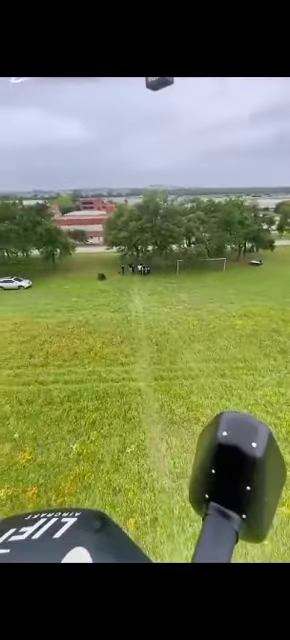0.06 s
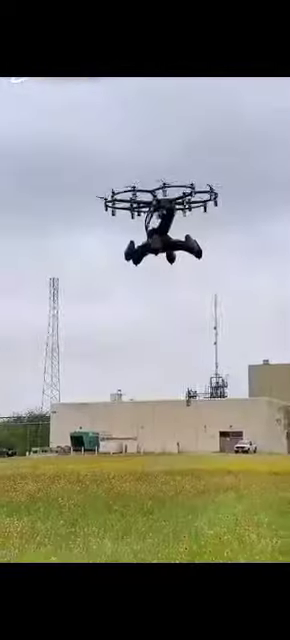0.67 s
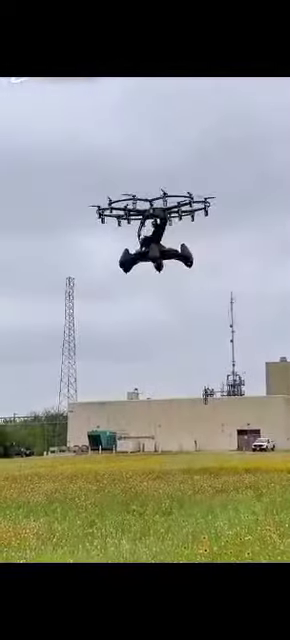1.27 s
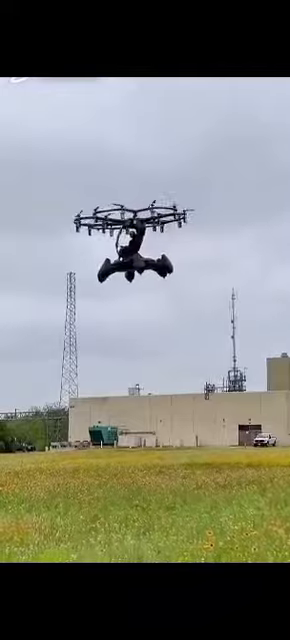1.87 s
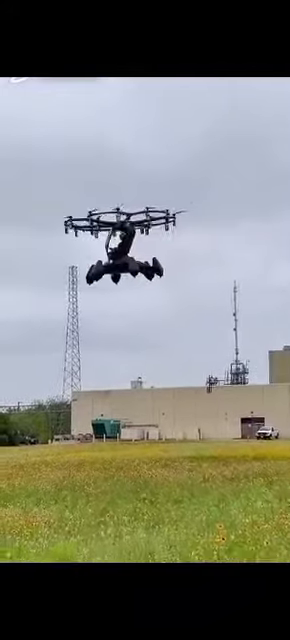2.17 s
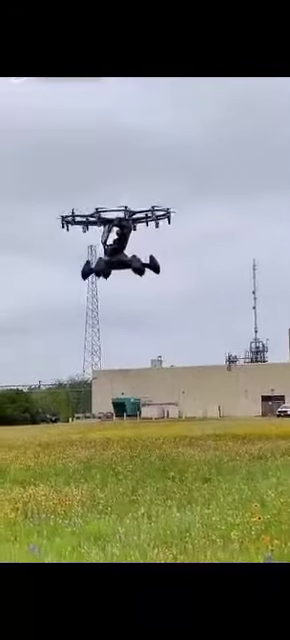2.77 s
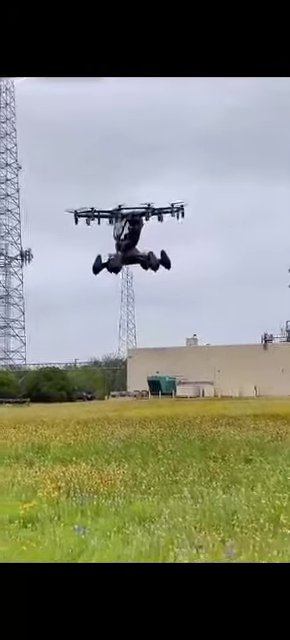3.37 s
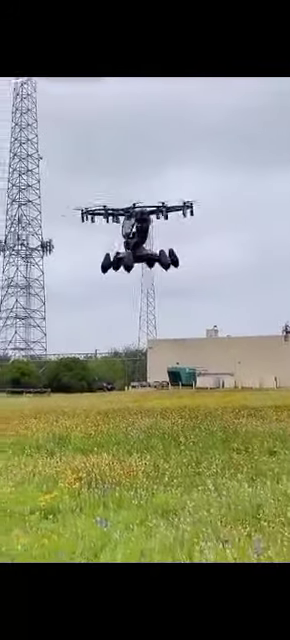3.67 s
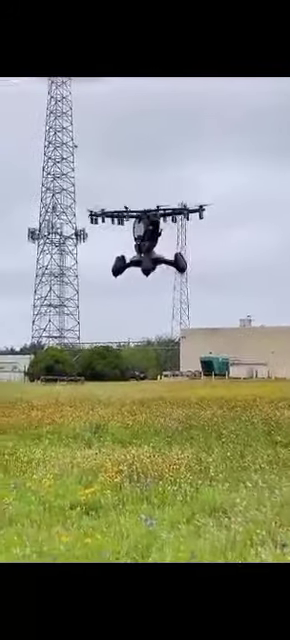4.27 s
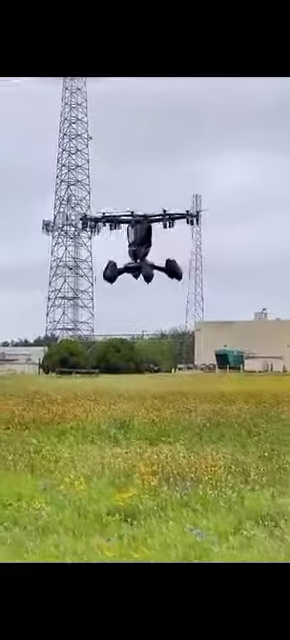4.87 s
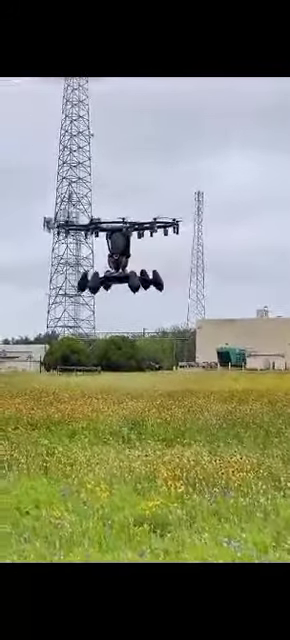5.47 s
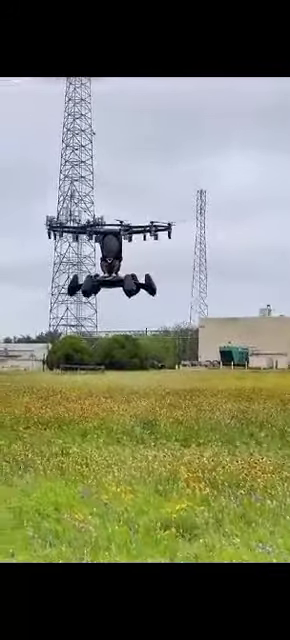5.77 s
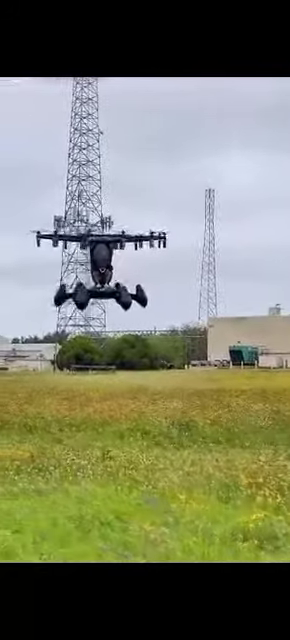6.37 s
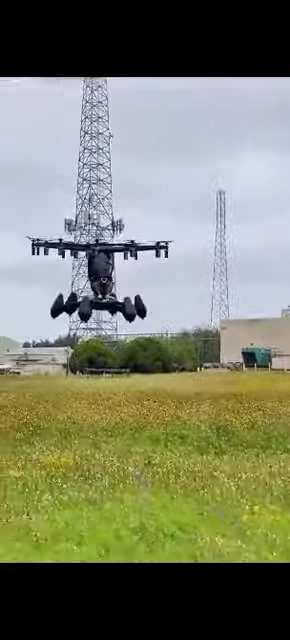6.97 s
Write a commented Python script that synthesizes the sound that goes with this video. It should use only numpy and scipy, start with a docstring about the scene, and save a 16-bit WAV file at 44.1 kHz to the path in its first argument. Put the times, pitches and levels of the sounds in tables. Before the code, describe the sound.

Many propellers buzz and throb as a big multicopter flies nearby, with airy hiss, brief high whistles and a slowly sweeping tone.

```python
"""A throbbing hum and a rough buzz: a large multicopter hovers and turns over a meadow.
Its eighteen two-blade propellers run at slightly different speeds, so their hum swells and fades
and their blade pulses merge into the buzz. The blades hiss and whistle, and air churns below them.
The echo from the ground cancels some pitches and boosts others, in a sweep as the craft moves."""
import sys
import numpy as np
from scipy import signal
from scipy.fft import rfft, irfft, next_fast_len
from scipy.io import wavfile
from scipy.ndimage import uniform_filter1d

SR = 44100
rng = np.random.default_rng(int(sys.argv[2]) if len(sys.argv) > 2 else 0)


def dump(signal):
    """Clip the signal to [-1, 1] and save it as 16-bit WAV at the path in sys.argv[1]."""
    limited = np.clip(np.atleast_2d(signal).T, -1, 1)
    pcm = np.round(limited * 32767).astype(np.int16)
    wavfile.write(sys.argv[1], SR, pcm)


N = 309141
T = np.arange(N) / SR
HZ = np.fft.rfftfreq(1024, 1 / SR)[:, None]

# How often blades pass, on hard-working and lightly loaded propellers:
# time_s, fast_hz, slow_hz, scatter_share
BLADE_RATES = [(.2, 98.5, 74.3, .007), (.6, 96, 77, .01), (.9, 94.2, 79, .014), (1.25, 92.2, 80, .018),
               (2, 91, 80.6, .024), (2.6, 91.8, 80.3, .026), (3.4, 90.5, 80.5, .028), (4.2, 87.3, 84, .026),
               (5, 87.8, 85.75, .034), (5.6, 87.84, 83.7, 0.04), (6.1, 92.5, 80.15, .05),
               (6.7, 94, 80.1, 0.041)]
# Loudness, falling as the craft turns away and rising as it nears: time_s, buzz_db, rasp_db
BLADE_LEVELS = [(0.2, -28, -33), (0.45, -25, -28), (.7, -24.5, -26), (1.0, -22.5, -26),
                (1.45, -23.5, -27.5), (1.7, -23, -29), (1.9, -22.5, -28), (2.5, -22.5, -27.5),
                (2.8, -24, -28.5), (3.3, -24.5, -28), (4.1, -23.5, -28.5), (4.7, -22.5, -27.5),
                (4.9, -22, -27), (5.15, -21.5, -29.5), (5.4, -21.5, -26), (5.75, -21.5, -26.5),
                (6.05, -22, -26), (6.7, -21, -24.5)]
# How the craft faces us: time_s, view (0 below, 1 side, 2 oblique, 3 quarter, 4 front)
VIEW = [(.2, 4), (.65, -0.5), (1.3, 1), (2.5, 1.4), (3.05, 2), (3.7, 2), (4.4, 3), (5.2, 3.5), (5.35, 3.5)]


def gain_of(db):
    """Turns decibels into a multiplier."""
    return 10 ** (np.asarray(db) / 20)


def evened(x):
    """Scales x to an average strength (rms) of 1."""
    return x / np.sqrt(np.mean(x ** 2) + 1e-20)


def steadied(x, size):
    """Keeps the strength of x near 1 over every stretch of size samples."""
    power = uniform_filter1d(uniform_filter1d(x ** 2, size=size), size=size)
    return x / np.sqrt(power + 0.0093 * power.mean())


def curve(rows, t=T):
    """Reads a table's columns at times t, sliding between its rows."""
    times, *columns = np.transpose(rows)
    return [np.interp(t, times, column) for column in columns]


def at_pitch(rows, hz):
    """Reads a table at pitches hz, sliding between its rows in octaves."""
    pitches, values = np.transpose(rows)
    return np.interp(np.log(hz + 1), np.log(pitches + 1), values)


def coloured(x, colour):
    """Filters x by a table of pitch_hz, level_db; the result has strength 1."""
    size = next_fast_len(N)
    gains = gain_of(at_pitch(colour, np.fft.rfftfreq(size, 1 / SR)))
    return evened(irfft(rfft(x, size) * gains, size)[:N])


def turning(x, colours, view):
    """Fades x from one tone colour to the next as view counts through them."""
    return evened(sum(np.maximum(1 - abs(view - k), 0) * coloured(x, colour)
                      for k, colour in enumerate(colours)))


def wander(rate):
    """A smooth random drift of strength 1 that swings up to rate times a second."""
    t = T[::200]
    hz = rate * np.geomspace(.1, 1, 20)[:, None]
    waves = np.sin(2 * np.pi * (hz * t + rng.random(hz.shape))) / np.sqrt(hz)
    return np.interp(T, t, evened(waves.sum(0)))


def propellers(count=18, trim=.6, light_db=1.0, fade_db=2, uneven_push=0.41, uneven_slap=0.44):
    """Each passing blade adds to a hum, gives the air a push and a slap, and swishes as it nears."""
    fast_hz, slow_hz, scatter = curve(BLADE_RATES)
    hum, pushes, slaps, swish = np.zeros((4, N))
    for k, offset in enumerate(np.linspace(-1.6, 1.6, count)):
        light = k % 3 == 1
        # the flight controller keeps trimming each motor around its own speed
        hz = (slow_hz if light else fast_hz) * (1 + scatter * (offset + trim * wander(3.5)))
        cycles = np.cumsum(hz) / SR + rng.random()
        strength = gain_of(light_db * light + fade_db * wander(3.))
        wave = np.cos(2 * np.pi * cycles)
        hum += strength * wave
        swish += strength ** 2 * np.exp(0.31 * (wave - 1))
        passes = np.flatnonzero(np.diff(np.floor(cycles)))
        air = rng.standard_normal(size=1000)[:len(passes)]  # blades meet uneven air
        pushes[passes] += strength[passes] * (1 + uneven_push * air)
        slaps[passes] += strength[passes] * (1 + uneven_slap * air)
    for pole in (.95, .85, .7, .5):  # a blade's length spreads its pulse in time
        pushes, slaps = signal.lfilter([-pole, 1], [1, -pole], [pushes, slaps])
    return hum, pushes, slaps, np.sqrt(swish)


def beats(rows, pointed=1.6):
    """Tones that swell and die away as the propellers pass through step."""
    out = np.zeros(N)
    cycles, last_s, last_hz = rng.random(), 0, 0
    for peak_s, half_s, hz, db in rows:
        cycles += (peak_s - last_s) * (hz + last_hz) / 2 + .5  # each beat flips the wave over
        last_s, last_hz = peak_s, hz
        near = abs(T - peak_s) < half_s
        t = T[near] - peak_s
        swell = np.cos(np.pi * t / (2 * half_s)) ** pointed
        out[near] += gain_of(db) * np.sqrt(2) * swell * np.cos(2 * np.pi * (hz * t + cycles))
    return out


def throbbing_hum(hum):
    """The propellers' tones make a restless hum, with throbs and growls standing out of it."""
    # The hum between throbs: time_s, level_db
    hum_level = [(0.2, -26.5), (0.5, -33), (1.1, -32.5), (2, -18.5), (2.35, -32), (3.0, -31.5), (4.2, -33),
                 (5, -32.5), (6.7, -30)]
    # Many propellers fall into step: peak_s, half_length_s, pitch_hz, level_db
    throbs = [(0.214, 0.035, 94.7, -26.0), (0.244, 0.023, 77.8, -25.5), (0.281, 0.026, 91.1, -26.4),
              (0.538, 0.117, 98.5, -24.8), (0.623, 0.04, 86.4, -25.7), (0.664, 0.072, 94.7, -20.1),
              (0.692, 0.033, 87.8, -25.0), (0.836, 0.056, 81.0, -23.5), (0.878, 0.053, 92.8, -21.6),
              (0.978, 0.04, 78.4, -25.7), (1.024, 0.066, 91.8, -19.3), (1.07, 0.028, 80.7, -24.1),
              (1.163, 0.04, 83.9, -18.3), (1.199, 0.047, 87.7, -17.0), (1.256, 0.04, 84.1, -20.3),
              (1.419, 0.051, 86.9, -20.1), (1.487, 0.054, 79.8, -27.8), (1.541, 0.115, 92.2, -18.9),
              (1.611, 0.071, 88.9, -23.0), (1.727, 0.079, 93.1, -22.3), (1.803, 0.057, 87.6, -16.6),
              (1.895, 0.057, 85.2, -18.3), (1.974, 0.036, 82.0, -19.7), (2.022, 0.045, 86.8, -21.2),
              (2.077, 0.03, 89.1, -23.4), (2.168, 0.098, 93.0, -19.2), (2.487, 0.071, 91.0, -20.0),
              (2.523, 0.135, 93.5, -17.0), (2.596, 0.043, 85.9, -20.8), (2.681, 0.038, 96.9, -23.9),
              (2.739, 0.035, 82.9, -23.0), (2.795, 0.126, 90.6, -16.4), (2.839, 0.055, 90.8, -15.4),
              (2.915, 0.034, 88.3, -22.9), (3.112, 0.092, 83.7, -21.2), (3.148, 0.072, 92.4, -22.7),
              (3.275, 0.078, 84.7, -21.6), (3.305, 0.085, 91.4, -15.8), (3.404, 0.048, 89.0, -19.6),
              (3.475, 0.062, 89.1, -17.3), (3.65, 0.057, 91.0, -20.8), (3.742, 0.039, 88.8, -24.6),
              (3.813, 0.05, 90.8, -23.6), (3.91, 0.057, 89.9, -23.1), (4.024, 0.099, 91.7, -20.1),
              (4.248, 0.123, 91.1, -17.9), (4.361, 0.114, 89.6, -23.1), (4.526, 0.067, 88.3, -18.2),
              (4.658, 0.221, 92.5, -19.1), (4.704, 0.033, 89.4, -25.7), (4.823, 0.075, 87.0, -18.7),
              (4.94, 0.036, 87.2, -25.4), (5.014, 0.053, 89.4, -19.5), (5.165, 0.133, 92.3, -14.7),
              (5.27, 0.107, 89.1, -14.7), (5.405, 0.091, 90.6, -19.4), (5.586, 0.051, 86.8, -18.9),
              (5.723, 0.056, 89.3, -14.2), (5.823, 0.05, 95.4, -20.0), (5.897, 0.019, 83.5, -26.1),
              (5.94, 0.033, 77.0, -26.5), (5.952, 0.053, 94.3, -19.7), (6.023, 0.032, 88.3, -12.7),
              (6.054, 0.069, 83.0, -24.0), (6.09, 0.024, 96.8, -26.2), (6.152, 0.046, 83.4, -18.8),
              (6.234, 0.042, 89.2, -15.9), (6.285, 0.042, 94.4, -24.4), (6.298, 0.082, 84.2, -15.8),
              (6.406, 0.104, 95.1, -17.3), (6.456, 0.042, 87.6, -23.2), (6.562, 0.066, 87.7, -18.9),
              (6.636, 0.071, 85.9, -20.3), (6.684, 0.064, 95.6, -16.2)]
    # Blade pulses line up on an overtone: peak_s, half_length_s, pitch_hz, level_db
    growls = [(.41, 0.037, 300, -25.5), (.78, 0.056, 289, -22), (.94, 0.057, 281, -26.5),
              (1.31, 0.054, 277, -24), (1.36, 0.12, 323, -25.5), (1.68, 0.053, 366, -24),
              (1.71, 0.082, 274.4, -22), (1.8, 0.097, 360, -27), (2.14, 0.057, 322, -27),
              (2.32, 0.11, 359, -38), (2.38, 0.057, 279.5, -27), (2.49, 0.063, 279, -31),
              (2.52, 0.1, 369.3, -38), (3.05, 0.22, 313.6, -31.5), (3.26, 0.076, 453.5, -32.5),
              (3.53, 0.099, 335, -29), (3.97, 0.16, 261.6, -29.5), (5.31, 0.062, 516, -27),
              (5.43, .05, 530, -25), (5.53, 0.053, 468, -29), (6.29, 0.073, 457, -23),
              (6.35, .06, 552, -24), (6.58, 0.076, 470, -23.5)]
    restless = gain_of(curve(hum_level)[0]) * steadied(hum, size=5000)
    return restless + beats(throbs) + beats(growls)


def buzz(pushes):
    """The low overtones of the blade pulses change colour as the craft turns."""
    # Tone colour from each direction: pitch_hz, level_db
    below = [(100, -42), (175, -11.5), (270, -5), (340, 1), (440, -2.5), (540, -3), (660, -3.5),
             (800, -11.5), (980, -20), (1400, -29), (2500, -69)]
    side = [(100, -41.5), (165, -19), (205, -4), (275, -3), (355, 2), (450, -10), (540, -9.5), (660, -5.5),
            (850, -12), (980, -18.5), (1400, -32.5), (2500, -64)]
    oblique = [(100, -47), (165, -14), (205, -16), (270, -2.5), (335, 0.5), (400, -3.5), (470, -4.5),
               (540, -8), (650, -15), (810, -8), (980, -20), (1400, -35.5), (2500, -65)]
    quarter = [(100, -44), (172, -4.5), (210, -15.5), (265, -0.5), (345, 2.5), (450, -2), (540, -4.5),
               (660, -14.5), (800, -11.5), (980, -12.5), (1400, -36), (2500, -66)]
    front = [(100, -43), (160, -0.5), (210, -11.5), (270, -1.5), (360, 1.5), (450, 1), (540, 1.5),
             (660, -9), (800, -9.5), (980, -3), (1400, -54), (2500, -68.5)]
    view = np.clip(curve(VIEW)[0], 0, 4)
    sound = turning(pushes, [below, side, oblique, quarter, front], view)
    return gain_of(curve(BLADE_LEVELS)[0]) * steadied(sound, size=10000)


def rasp_and_hiss(slaps, swish, airy=1.3, crackle=0.2, swirl_trim_db=-3, gust_db=1.0):
    """Blade slaps rasp, swirling air rushes and blade edges hiss; gusts sway them together."""
    # Tone colours of the rasp (from two directions), swirls and hiss: pitch_hz, level_db
    rasp_side = [(550, -40), (1000, -0.5), (1250, 0), (1550, -1), (1900, -1), (2300, -6), (2650, -3.5),
                 (3200, -10.5), (3900, -9.5), (4700, -11.5), (5400, -16.5), (6500, -15.5), (9000, -54.5)]
    rasp_front = [(550, -32), (1000, -9.5), (1250, -6), (1550, -4.5), (1900, -6.5), (2300, -9.5),
                  (2650, -8), (3200, -15), (3900, -13.5), (4700, -14), (5400, -19.5), (6500, -22.5),
                  (9000, -47)]
    swirl_colour = [(4800, -24.5), (5450, -18), (5700, 1), (6200, 2), (6700, 1.5), (7100, -3.5),
                    (7600, -11.5), (8600, -40.5)]
    hiss_colour = [(5500, -29), (7200, -1), (7800, -4), (8600, 1), (9300, -4.5), (10800, -6), (12300, -11),
                   (14300, -16)]
    # Loudness of the air noise: time_s, swirl_db (before its trim), hiss_db
    air_levels = [(0.2, -34, -45.5), (0.86, -29.5, -39.5), (1.34, -38, -41.5), (2.0, -34, -41),
                  (2.9, -38.5, -42.5), (3.2, -38.5, -43), (4.2, -42.5, -43), (4.65, -34.5, -40),
                  (4.9, -37, -42), (5.2, -39, -42), (5.5, -38, -41), (5.8, -34.5, -40.5),
                  (6.07, -30.5, -39.5), (6.35, -35, -39), (6.7, -29, -36)]
    swirl_db, hiss_db = curve(air_levels)
    rasp_db = curve(BLADE_LEVELS)[1]
    slaps = evened(slaps - slaps.mean())
    low_air, mid_air, high_air = evened(swish) * rng.standard_normal((3, N))
    view = np.clip((curve(VIEW)[0] - 1) / 3, 0, 1)
    rasp = gain_of(rasp_db) * turning(slaps + airy * low_air, [rasp_side, rasp_front], view)
    swirls = gain_of(swirl_db + swirl_trim_db) * coloured(mid_air, swirl_colour)
    hiss = gain_of(hiss_db) * coloured(high_air + crackle * slaps, hiss_colour)
    return gain_of(gust_db * wander(6)) * (rasp + swirls + hiss)


def nearest_propeller(waver=.005, flutter_db=3):
    """Early on, while the propellers run nearly in step, the nearest sings out as a clean buzz."""
    # Its fading loudness: time_s, level_db
    loudness = [(.2, -32), (.6, -32), (1.0, -32.5), (1.3, -32.5), (1.7, -44.5), (2.6, -71)]
    # Its overtones, from twice the blade rate upward: level_db
    overtones = [-5.5, -10, -9, -7.5, 2, -1, -4.5, -18.5]
    cycles = np.cumsum(curve(BLADE_RATES)[0] * (1 + waver * wander(5))) / SR
    tones = np.zeros(N)
    for k, db in enumerate(overtones, start=2):
        strength = gain_of(db + flutter_db * wander(14))
        tones += strength * np.cos(2 * np.pi * (k * cycles + rng.random()))
    return gain_of(curve(loudness)[0]) * evened(tones)


def downwash(far_db=-44, near_db=-36.0, stereo_width=0.21, waver=3.5):
    """Air blown downward churns, louder as the craft nears, with two faint wavering tones in it."""
    # The low tones: pitch_hz, level_db
    low_tones = [(52, -44.5), (129, -47.5)]
    # Tone colour of the churning air: pitch_hz, level_db
    churn_colour = [(20, -9.5), (35, -12), (55, 0), (90, -2), (140, -1.5), (230, -11.5), (600, -23.5),
                    (2000, -72)]
    tones = sum(gain_of(db) * evened(np.sin(2 * np.pi * hz * T + waver * wander(7.4)))
                for hz, db in low_tones)
    middle, sides = (coloured(rng.standard_normal(N), churn_colour) for _ in range(2))
    churn = middle + stereo_width * np.array([sides, -sides])
    return gain_of(np.linspace(far_db, near_db, N)) * churn + tones


def whistle(peak_s, half_s, hz, glide, sag, width_hz, purity=0):
    """Swirls leaving a blade in step make a fuzzy, gliding whistle; purity adds a clean tone."""
    swell = np.exp(-.5 * ((T - peak_s) / half_s) ** 2)
    pole = np.exp(-np.pi * width_hz / SR)
    fuzz_a, fuzz_b = signal.lfilter([1], [1, -2 * pole, pole * pole], rng.standard_normal((2, N)))
    angle = 2 * np.pi * np.cumsum(hz + glide * (T - peak_s) - sag * swell) / SR
    return swell * evened((evened(fuzz_a) + purity) * np.cos(angle) + evened(fuzz_b) * np.sin(angle))


def blade_whistles():
    """Now and then a blade whistles, and a second blade joins in a little higher."""
    # Whistle pairs: peak_s, half_length_s, pitch_hz, glide_hz_per_s, sag_hz, level_db, upper_db
    pairs = [(0.243, .04, 6010, -300, -3, -37.5, -40), (.57, .04, 5900, 102, 1, -55, -48),
             (.665, .025, 5920, 299.5, 12, -26.5, -35.5), (0.738, .025, 5985, 399.5, 4, -31.5, -45),
             (0.824, 0.045, 6000, 400, 0, -31, -44), (0.885, .03, 6100, 400.5, -3, -34, -46),
             (1.12, 0.1, 6260, 505, 1, -39.5, -54), (5.262, 0.076, 6210, 294.5, 20, -45, -41),
             (5.623, 0.052, 6220, 499, 39.5, -37.5, -56.5), (5.968, 0.03, 6200, -1500, 1, -37, -39.5),
             (6.055, 0.042, 6160, 0.5, 150.5, -31, -36), (6.09, .025, 6200, 1500, 0, -29.5, -33.5),
             (6.201, 0.033, 6200, 2000, -2.5, -35, -38.5)]
    # The upper whistle's pitch over the lower one's: time_s, ratio
    upper_ratio = [(.7, 1.088), (5.3, 1.15), (6.1, 1.14)]
    out = np.zeros(N)
    for peak_s, half_s, hz, glide, sag, db, upper_db in pairs:
        upper_hz = curve(upper_ratio, peak_s)[0] * hz
        out += gain_of(db) * whistle(peak_s, half_s, hz, glide, sag, width_hz=70, purity=1.4)
        out += gain_of(upper_db) * whistle(peak_s, half_s, upper_hz, glide, sag, width_hz=140)
    return out


def sizzle():
    """Narrow bands of hiss from the blades swell and fade."""
    # Swells and short puffs: peak_s, half_length_s, pitch_hz, width_hz, level_db
    puffs = [(.39, 0.027, 8700, 1100, -42), (.955, .03, 8500, 698, -41), (1.118, 0.036, 1250, 250, -27.5),
             (1.17, .06, 4650, 250, -42), (1.9, 0.27, 8640, 449, -49), (2.22, 0.12, 4760, 700, -42),
             (3.06, 0.045, 7960, 1490, -43.5), (3.157, 0.043, 10100, 1300, -47),
             (2.55, 0.27, 851, 110, -34), (3.267, 0.045, 1986, 250, -34), (3.635, .022, 8500, 1490, -41),
             (4.482, 0.26, 10900, 850, -48.5), (5.87, .06, 6540, 350.8, -41),
             (6.335, .08, 6560, 400, -34.5), (6.559, 0.023, 6420, 496.5, -38)]
    return sum(gain_of(db) * whistle(peak_s, half_s, hz, 0, 0, width_hz)
               for peak_s, half_s, hz, width_hz, db in puffs)


def ground_echo(x, soil_cycles=0.24, soil_hz=950, low_cut_hz=240):
    """The meadow adds a late, duller copy; soft soil shifts the timing of its low waves."""
    # The echo, duller when the wide craft is near: time_s, strength_share, dull_above_hz
    echo = [(.2, .68, 7000), (.9, .66, 8000), (1.9, .62, 6000), (3.1, .6, 6500), (3.8, .47, 7000),
            (4.5, .52, 5500), (5.1, .52, 3500), (5.7, .52, 2600), (6.7, .38, 1900)]
    # How late the echo arrives: time_s, delay_ms
    echo_delay = [(.24, 1.766), (.55, 1.645), (.9, 1.594), (1.3, 1.514), (1.6, 1.53), (1.95, 1.525),
                  (2.25, 1.462), (2.6, 1.53), (2.85, 1.646), (3.15, 1.834), (3.5, 1.884), (3.8, 1.886),
                  (4.1, 1.958), (4.45, 2.04), (4.9, 2.3), (5.3, 2.43), (5.7, 2.5), (6.7, 2.45)]
    _, t, spectrum = signal.stft(x, SR, nperseg=1024, noverlap=768)
    delay_s = curve(echo_delay, t)[0] / 1000
    strength, dull_hz = curve(echo, t)
    share = strength * np.exp(-(HZ / dull_hz) ** 2) * HZ ** 2 / (HZ ** 2 + low_cut_hz ** 2)
    cycles = HZ * delay_s - soil_cycles * np.exp(-(HZ / soil_hz) ** 4)
    spectrum *= (1 + share * np.exp(-2j * np.pi * cycles)) / np.sqrt(1 + share ** 2)
    return signal.istft(spectrum, SR, nperseg=1024, noverlap=768)[1][:N]


def microphone_ports(x, treble_hz=10000):
    """Left and right openings share the direct sound; scattered sound arrives with random timing."""
    # How strongly each pitch is scattered: pitch_hz, relative_db
    scatter = [(60, -29), (250, -30.5), (500, -15), (1000, -10.5), (2000, -19), (3500, -4), (4800, -5.5),
               (5600, -1), (6800, -8.5), (8500, -6), (10000, -21), (13000, -27.5)]
    # The top treble spreads wide between left and right from about 4.9 s on: time_s, extra_db
    treble_spread = [(4.6, 0), (4.95, 23.5), (6.7, 21.5)]
    # How much louder the left is than the right: pitch_hz, difference_db
    left_louder = [(100, 0), (650, -2), (1000, -0.1), (3400, -1), (4300, 3), (5300, 2), (6100, 5),
                   (7200, -0.5), (8700, -3), (10500, -1)]
    # How far the left wave runs ahead of the right: pitch_hz, lead_radians
    left_lead = [(0, -0.03), (860, 0.087), (1640, -0.37), (2150, -0.35), (2670, 0.66), (3270, 0.64),
                 (3790, 1.6), (4740, 0.072), (5940, -0.69), (6460, -0.2), (7750, -0.52), (8350, -0.78),
                 (9390, 0.5), (15200, 0.0)]
    _, t, spectrum = signal.stft(x, SR, nperseg=1024, noverlap=768)
    side = np.array([1, -1])[:, None, None]
    treble = 1 - np.exp(-(HZ / treble_hz) ** 8)
    scatter_db = at_pitch(scatter, HZ) + treble * curve(treble_spread, t)[0]
    scattered = 2 * gain_of(scatter_db) * np.exp(2j * np.pi * rng.random(spectrum.shape))
    stereo = spectrum * (1 + side * scattered)
    stereo *= gain_of(side * at_pitch(left_louder, HZ) / 2)
    stereo *= np.exp(.5j * side * at_pitch(left_lead, HZ))
    return signal.istft(stereo, SR, nperseg=1024, noverlap=768)[1][:, :N]


def scene():
    """The blade noise and its ground echo join the hum, the nearest propeller and the downwash."""
    hum, pushes, slaps, swish = propellers()
    blades = buzz(pushes) + rasp_and_hiss(slaps, swish) + blade_whistles() + sizzle()
    craft = ground_echo(blades) + throbbing_hum(hum) + nearest_propeller()
    return microphone_ports(craft) + downwash()


def record(dry):
    """The sound switches on and off abruptly; the deepest rumble and highest treble are cut."""
    start_s, stop_s = 0.1917, 6.727
    rumble_hz, top_hz = 22, 14400
    gate_times = [start_s, start_s + 0.0023, stop_s - .002, stop_s, stop_s + 0.0031, stop_s + 0.028]
    gate = np.interp(T, gate_times, [0, 1, 1, 0.5, 0.11, 0])
    rumble_cut = signal.butter(2, rumble_hz, "highpass", fs=SR, output="sos")
    treble_cut = signal.firwin(511, top_hz, window=("kaiser", 9), fs=SR)
    return signal.oaconvolve(signal.sosfilt(rumble_cut, dry * gate), treble_cut[None], "same")


dry = scene()
out = record(dry)
dump(out)
```